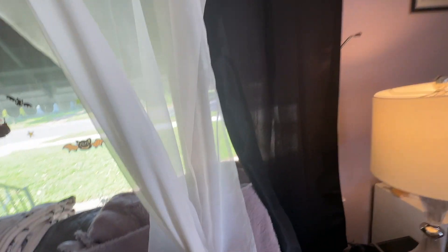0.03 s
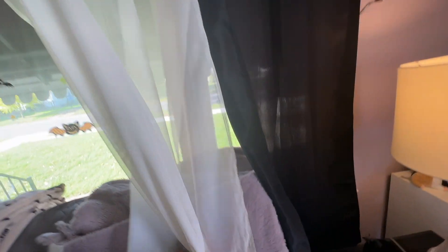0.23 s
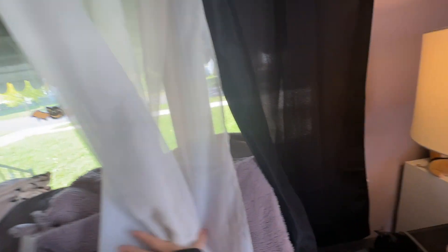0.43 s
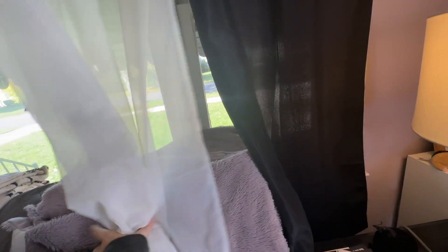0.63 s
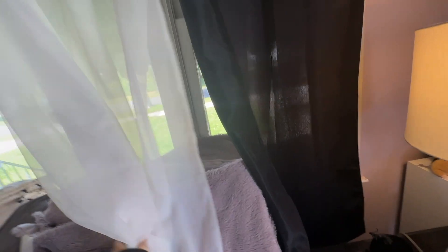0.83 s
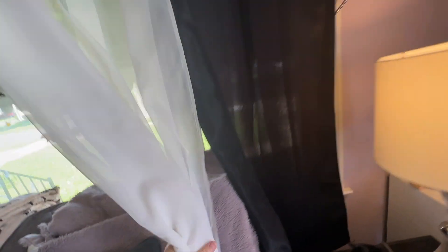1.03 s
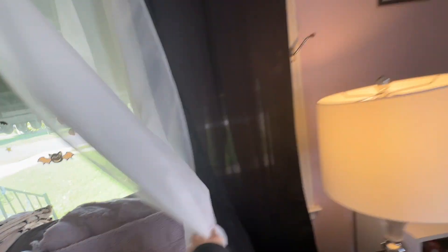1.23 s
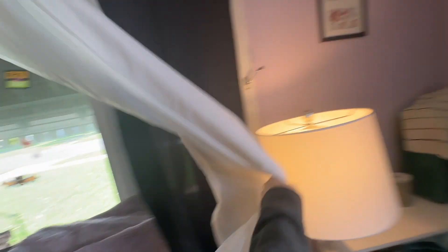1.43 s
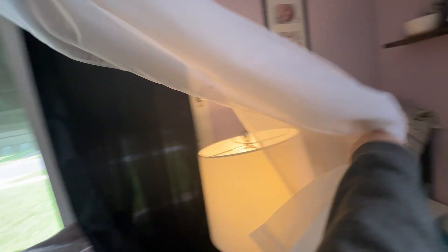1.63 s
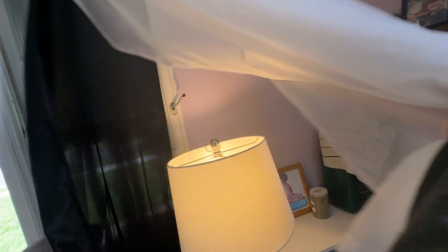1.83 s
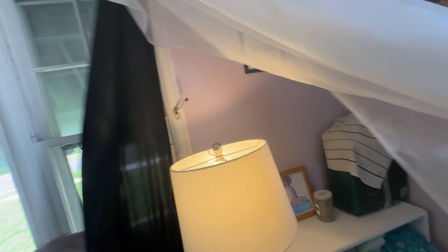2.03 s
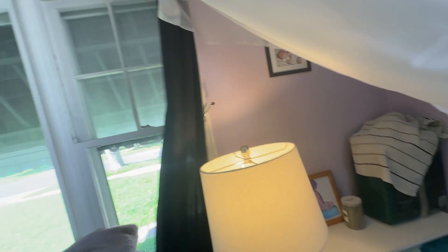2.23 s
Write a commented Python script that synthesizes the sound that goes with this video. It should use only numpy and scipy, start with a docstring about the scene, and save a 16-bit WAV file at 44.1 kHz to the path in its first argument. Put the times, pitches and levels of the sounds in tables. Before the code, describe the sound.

A curtain is pulled open along a metal rod in a quiet, lightly reverberant bedroom. From 0.1 to 0.5 s gathered cloth rustles faintly with dull pops and dry ticks; soft knocks and clicks come near 0.55 and 0.68. A low air puff bumps the microphones around 1.1. From 1.25 to 2.1 jerky scraping hisses and rings, loudest near 1.58, then fades to soft room hush.

```python
"""A sheer curtain is dragged along a thin metal rod in a bedroom: jerky stick-slip friction makes the tube hiss
and ring. Before that the cloth, gathered by hand, rustles, ticks and pops as random crumples and short dying
sines; a soft low rustle and then a wooden knock both ring the same damped modes. The swing puffs air over the
two microphones as low noise of opposite sign. A quiet room adds steady coloured noise and sparse decaying
reflections."""
import sys
import numpy as np
from scipy import signal
from scipy.io import wavfile
from scipy.ndimage import uniform_filter1d, map_coordinates

SR = 44100
rng = np.random.default_rng(int(sys.argv[2]) if len(sys.argv) > 2 else 0)


def waveform_to_disk(signal):
    """Save audio, clipped to [-1, 1], as 16-bit WAV at the path in sys.argv[1]."""
    frames = np.transpose(np.atleast_2d(signal))
    scaled = np.clip(frames, -1, 1) * 32767
    samples = np.round(scaled).astype(np.int16)
    wavfile.write(sys.argv[1], SR, samples)


def natural_amplitude(level_db):
    """Convert a level in decibels to a linear amplitude factor, elementwise."""
    exponent = np.asarray(level_db, float) / 20
    return 10 ** exponent


N = 100503
T = np.arange(N) / SR

# Spectrum of the quiet room. Each row: frequency in Hz, relative level in dB.
HUSH_SPECTRUM = [(25, -4.5), (50, 11), (260, 4), (500, -8.5), (2600, -17.5), (3100, -24), (5600, -24),
                 (7500, -24), (9600, -21), (11300, -25), (12200, -53)]
# Swell and fade of the room's bass. Each row: time in seconds, relative level in dB.
BASS_LEVEL = [(0, -6.5), (1.4, -1), (2.1, -9.5)]
# Small dry ticks. Each row: start in seconds, level of each low ring in dB, centre pitch in Hz,
# level of each high ring minus that of a low one in dB.
TICKS = [(.0225, -49, 2000, 4), (.229, -32, 1400, -20), (.2325, -34, 2400, -16), (.6637, -30, 2000, -14),
         (.6794, -26, 1400, -28), (1.1065, -42, 1300, -3)]
# The hand gathers cloth. Each row: time in seconds, level in dB.
GATHER_LEVEL = [(.12, -59), (.4, -63), (.66, -62), (.7, -56), (.82, -59), (.88, -68), (1.2, -62)]
# The cloth crumples in bursts. Each row: start in seconds, level in dB, hold in seconds.
RUSTLES = [(0.131, -55.5, 0.014), (0.173, -53.5, 0.02), (0.272, -52.5, 0.019), (0.337, -54, 0.014),
           (0.69, -58, 0.042)]
# Spectrum of crumpling cloth. Each row: frequency in Hz, relative level in dB.
CLOTH_SPECTRUM = [(200, -6.5), (700, 5), (1240, 1.5), (2750, -1), (3100, -17), (5790, -4), (7400, -18),
                  (10000, -18.5), (12200, -58)]
# Folds of cloth pop. Each row: start in seconds, initial level in dB.
POPS = [(.130, -43), (.1585, -39), (.280, -46), (.3395, -42), (.4455, -48)]
# A soft low rustle of cloth, then a wooden knock, both ringing the same damped modes. Each row: start in
# seconds, peak level before the onset ramp in dB.
KNOCKS = [(0.536, -46), (0.682, -30)]
# Modes of the wood. Each row: frequency in Hz, relative level in dB, time to fall 60 dB in seconds.
WOOD_MODES = [(126, 4, 0.19), (194, 18.5, 0.032), (369, 7, 0.12), (800, 11, 0.019)]
# Air stirred over the microphones. Each row: time in seconds, low-band level in dB before a lift common
# to both bands, upper-band level minus low-band level in dB.
DRAUGHT_LEVELS = [(0, -100, -23), (.49, -76, -21), (.86, -84, -23), (.93, -49, -40), (1.07, -45.5, -15),
                  (1.1, -32, -6), (1.15, -41, -17.5), (1.22, -39, -14.5), (1.28, -58.5, -61),
                  (1.46, -79, -26), (2.28, -88.5, -21)]
# Spectrum of the draught's low band. Each row: frequency in Hz, relative level in dB.
GUST_SPECTRUM = [(20, -40), (40, -6), (75, 2.5), (115, -2.5), (160, -28), (500, -76)]
# Spectrum of the draught's upper band. Each row: frequency in Hz, relative level in dB.
FLAP_SPECTRUM = [(150, 1.5), (230, 6), (330, -2.5), (900, -88)]
# Steady drag along the rod. Each row: time in seconds, middle-band level in dB,
# treble level minus middle level in dB.
DRAG_LEVELS = [(1.17, -91.5, 23), (1.22, -55.5, 1), (1.27, -43.5, -1.5), (1.42, -43, 3.5), (1.7, -38.5, 5),
               (2.04, -44.5, 2.5), (2.15, -55.5, -0.5), (2.28, -67, -16)]
# The hem jerks forward. Each row: start in seconds, middle-band level in dB, hold in seconds,
# treble minus middle in dB, low mids minus middle in dB.
SNAGS = [(1.2717, -38, 0.0084, 0.5, -20), (1.342, -30, 0.0097, 2.5, -2.5),
         (1.424, -36.5, 0.021, -1.5, -13.5), (1.454, -38, 0.014, 6.5, -3.5), (1.517, -29.5, 0.078, 5, -9),
         (1.576, -19.5, 0.013, -6.5, -10.5), (1.605, -29.5, 0.058, -1.5, -9), (1.63, -28, 0.011, 4.5, -7.5),
         (1.738, -35.5, 0.022, 7, -18.5), (1.762, -23.5, 0.011, -1, -9), (1.778, -34.5, 0.035, -7, -1.5),
         (1.841, -34, 0.019, 7.5, -5), (1.868, -32.5, 0.016, 4.5, -1.5), (2.051, -35, 0.018, 1.5, -1.5),
         (2.088, -43, 0.027, -9, 0)]
# Spectrum of the rubbed tube, whose bands open steeply at its ring frequencies.
# Each row: frequency in Hz, relative level in dB.
TUBE_SPECTRUM = [(220, -48.5), (330, -11), (700, -11.5), (1050, -19), (1550, -9), (2300, 5.5), (4600, -9.5),
                 (5250, -11.5), (5550, -2), (6300, -5.5), (7550, -13), (7900, -9.5), (10300, -10.5),
                 (10700, -9.5), (11400, -15.5), (12500, -77)]
# Ringing modes of the rod. Each row: frequency in Hz, relative level in dB.
ROD_MODES = [(1240, 7.5), (1715, 13.5), (2304, -1.5), (2546, 8), (2722, 18), (5600, 2)]
# Low hollow resonance that shifts as cloth bunches up on the rod. Each row: time in seconds, frequency in Hz.
HOLLOW_PITCH = [(1.35, 377), (1.49, 368), (1.53, 660), (1.62, 860), (1.73, 800), (1.78, 373), (2.05, 397)]
# The microphones turn. Each row: time in seconds, left ahead of right in seconds.
LEFT_LEAD = [(1.25, 0.0014), (1.55, .0006), (1.8, 0.000476)]
# Decay of the room. Each row: frequency in Hz, time to fall 60 dB in seconds.
ROOM_DECAY = [(3000, 0.28), (12000, 0.13)]


def evened(x):
    """Normalisation to unit rms."""
    return x / np.sqrt(np.mean(x ** 2) + 1e-20)


def curve(rows, col=1):
    """Linear interpolation of one column of a time table, per sample."""
    rows = np.array(rows)
    return np.interp(T, rows[:, 0], rows[:, col])


def colour(points):
    """Minimum-phase filtering: taps whose phase is the Hilbert transform of the log spectrum."""
    hz = np.fft.rfftfreq(4096, 1 / SR) + 1  # 1 Hz offset avoids log(0)
    point_hz, db = np.transpose(points)
    log_gain = np.log(natural_amplitude(np.interp(np.log(hz), np.log(point_hz), db)))
    mirrored = np.concatenate([log_gain, log_gain[-2:0:-1]])
    response = np.conj(np.exp(signal.hilbert(mirrored)))
    return np.fft.ifft(response).real[:2048]


def through(x, taps):
    """Linear filtering: convolution cut to length."""
    return signal.oaconvolve(x, taps)[:N]


def patchy(x, db):
    """Random modulation: patches of time and frequency grow louder or softer, by db rms."""
    z = signal.stft(x, nperseg=512, noverlap=384)[2]
    field = rng.standard_normal(z.shape[::-1]).T
    field = uniform_filter1d(field, size=2, axis=0)
    field = evened(uniform_filter1d(field, size=12, axis=1))
    return signal.istft(z * natural_amplitude(db * field), nperseg=512, noverlap=384)[1][:N]


def grit(per_s, spread_db):
    """Random impulse process: clicks of either sign, a few of them large."""
    chance, sign, size = rng.random((N, 3)).T
    excess = np.minimum(-np.log(size + 1e-9), 5)
    return (chance < per_s / SR) * np.sign(sign - 0.5) * natural_amplitude(spread_db * excess)


def burst(s, hold):
    """Transient envelope: linear rise, hold counted from the start, exponential fall."""
    rise_s, fall_s = 0.0017, 0.01  # fall_s: time constant
    t = T - s
    return np.clip(t / rise_s, 0, 1) * np.exp(-np.maximum(t - hold, 0) / fall_s)


def modes(rows, length=0.3):
    """Modal synthesis of a struck object: a sum of exponentially dying sines."""
    t = np.arange(round(length * SR)) / SR
    return sum(natural_amplitude(db - 60 * t / max(t60, 0.004)) * np.sin(2 * np.pi * hz * t) for hz, db, t60 in rows)


def add(mix, s, sound, rise_s):
    """Superposition: mixes a sound in at time s with a short linear rise."""
    ramp = np.minimum(T[:len(sound)] / rise_s, 1)
    part = mix[round(s * SR):][:len(sound)]
    part += (sound * ramp)[:len(part)]


def hush():
    """Stationary noise: the room, its bass common to both microphones, and the microphones' own hiss."""
    level_db, mono_hz = -57.5, 396
    alike = 0.14  # correlation of the two microphones above mono_hz
    a, b = rng.standard_normal((N, 2)).T
    high_pass = signal.butter(2, mono_hz, "high", fs=SR, output="sos")
    top_a, top_b = signal.sosfiltfilt(high_pass, [a, b])
    bass = (a - top_a) * natural_amplitude(curve(BASS_LEVEL))
    right = bass + alike * top_a + np.sqrt(1 - alike ** 2) * top_b
    taps = colour(HUSH_SPECTRUM)
    both = [patchy(through(x, taps), 3.5) for x in (bass + top_a, right)]
    return natural_amplitude(level_db) * evened(np.array(both))


def ticks():
    """Highly damped modes: each tick is a very short pair of low rings with three high ones on top."""
    t60_s, top_hz = 0.009, 6400
    out = np.zeros(N)
    for s, db, hz, top_db in TICKS:
        low = [(hz * ratio, db, t60_s) for ratio in (0.85, 1.15)]
        high = [(top_hz * ratio, db + top_db, t60_s) for ratio in (0.7, 1, 1.5)]
        add(out, s, modes(low + high), 0.0005)
    return out


def gather():
    """Crackling noise: dense random crumples of thin cloth in the hand, coloured by the fabric."""
    crumples = evened(grit(per_s=3000, spread_db=4))
    cloth = through(0.91 * crumples + 0.43 * rng.standard_normal(N), colour(CLOTH_SPECTRUM))
    active = (T > GATHER_LEVEL[0][0]) * (T < GATHER_LEVEL[-1][0])
    level = natural_amplitude(curve(GATHER_LEVEL)) * active
    level = level + sum(natural_amplitude(db) * burst(s, hold) for s, db, hold in RUSTLES)
    return level * evened(patchy(cloth, 3))


def pops():
    """A single damped mode: each popping fold of cloth is one dull, dying sine."""
    hz, t60_s = 963, 0.022
    out = np.zeros(N)
    for s, db in POPS:
        add(out, s, modes([(hz, db, t60_s)]), 0.001)
    return out


def knocks():
    """Impulse response of a wooden body: the knock sets off its damped modes, and a soft low rustle of cloth
    before it is given the same modes."""
    out = np.zeros(N)
    thud = modes(WOOD_MODES)
    for s, db in KNOCKS:
        add(out, s, -natural_amplitude(db) * thud / abs(thud).max(), 0.002)
    return out


def draught():
    """Low-frequency turbulence: lumpy noise pushing one microphone while it pulls the other."""
    lift_db = 12
    right_gain, loose_gain = -0.51, 0.17  # opposite copy, and independent part, at the right
    low = natural_amplitude(curve(DRAUGHT_LEVELS) + lift_db)
    high = natural_amplitude(curve(DRAUGHT_LEVELS) + curve(DRAUGHT_LEVELS, col=2) + lift_db)

    def air():
        gust, flap = rng.standard_normal((N, 2)).T
        gust = evened(through(gust, colour(GUST_SPECTRUM)))
        return low * gust + high * evened(through(flap, colour(FLAP_SPECTRUM)))

    left, loose = air(), air()
    return np.array([left, right_gain * left + loose_gain * loose])


def resonate(x, hz, width_hz):
    """Heterodyne resonance: shifts the curve hz to zero, low-passes, and shifts back."""
    turn = np.exp(2j * np.pi * np.cumsum(hz) / SR)
    r = np.exp(-np.pi * width_hz / SR)
    return (turn * signal.lfilter([1 - r], [1, -r], x / turn)).real


def drag():
    """Stick-slip friction: tiny slips and smooth rubbing drive the tube's broad bands and ringing modes."""
    smooth_share, ring_db, ring_t60_s = 0.42, -6, 0.1
    hollow_db, hollow_width_hz = -9, 58
    low_db = -6  # low mids minus middle band in the steady drag
    alike = 0.23  # the long rod sounds partly different at the two microphones: their correlation
    ring = modes([(hz, db, ring_t60_s) for hz, db in ROD_MODES])
    body = colour(TUBE_SPECTRUM)
    steady = natural_amplitude(curve(DRAG_LEVELS)) * (T > DRAG_LEVELS[0][0])
    steady_rel_db = [0, curve(DRAG_LEVELS, col=2), low_db]

    def rubbed_band(edges, is_low):
        slips = evened(grit(per_s=3500, spread_db=4))
        rub = (1 - smooth_share) * slips + smooth_share * rng.standard_normal(N)
        tube = evened(through(rub, body)) + natural_amplitude(ring_db) * evened(through(rub, ring))
        band_pass = signal.butter(3, edges, "band", fs=SR, output="sos")
        band = evened(signal.sosfilt(band_pass, patchy(tube, 6)))
        if is_low:
            hollow = evened(resonate(rub, curve(HOLLOW_PITCH), hollow_width_hz))
            band = evened(band + natural_amplitude(hollow_db) * hollow)
        return band

    out = np.zeros((2, N))
    # middle, treble, low mids: band edges in Hz
    for k, edges in enumerate(([1400, 5000], [5000, 15000], [300, 1400])):
        left, other = (rubbed_band(edges, k == 2) for _ in range(2))
        power = (steady * natural_amplitude(steady_rel_db[k])) ** 2
        for s, db, hold, treble_db, low_mids_db in SNAGS:
            jerk_db = db + (0, treble_db, low_mids_db)[k]
            power = power + (natural_amplitude(jerk_db) * burst(s, hold)) ** 2
        right = alike * left + np.sqrt(1 - alike ** 2) * other
        out += np.sqrt(power) * np.array([left, right])
    return out


def pair(x, lead_s):
    """Interaural-style time difference: the right microphone hears later by lead_s."""
    left, right = x * np.ones((2, 1))
    return np.array([left, map_coordinates(right, [(T - lead_s) * SR], order=3)])


def room(x):
    """Reverberation: sparse reflections of random sign, each band dying at its own speed."""
    taps = np.zeros((2, SR // 2))
    at = np.arange(120, SR // 2 - 20, 20)
    at = at + rng.integers(0, 20, (2, len(at)))
    np.put_along_axis(taps, at, rng.choice([-1., 1.], at.shape), 1)
    hz, t, z = signal.stft(taps, SR, nperseg=256)
    decay_hz, t60 = np.transpose(ROOM_DECAY)
    decay = natural_amplitude(-60 * t / np.interp(hz, decay_hz, t60)[:, None])
    tail = signal.istft(z * decay, SR, nperseg=256)[1]
    return signal.fftconvolve(x[None], tail / np.linalg.norm(tail[0]), axes=1)[:, :N]


def scene():
    """Superposition: rod, cloth and knocks in the room, with the draught and the hush on top."""
    rod_room_db, near_room_db, pan_db = -1.5, -6.5, 2  # pan_db: left minus right
    rod = drag()
    near = gather() + ticks() + pops() + knocks()
    wet = natural_amplitude(rod_room_db) * rod[0] + natural_amplitude(near_room_db) * near
    rod = rod * natural_amplitude(np.array([[pan_db], [-pan_db]]) / 2)
    direct = pair(rod, curve(LEFT_LEAD)) + pair(near, 0.0001)
    return direct + room(wet) + draught() + hush()


def band_limit(x):
    """A steep low-pass at the top of the band."""
    return signal.sosfilt(signal.butter(12, 12260, fs=SR, output="sos"), x)


def record(dry):
    """Takes the finished mix to its final form."""
    return band_limit(dry)


dry = scene()
out = record(dry)
waveform_to_disk(out)
```